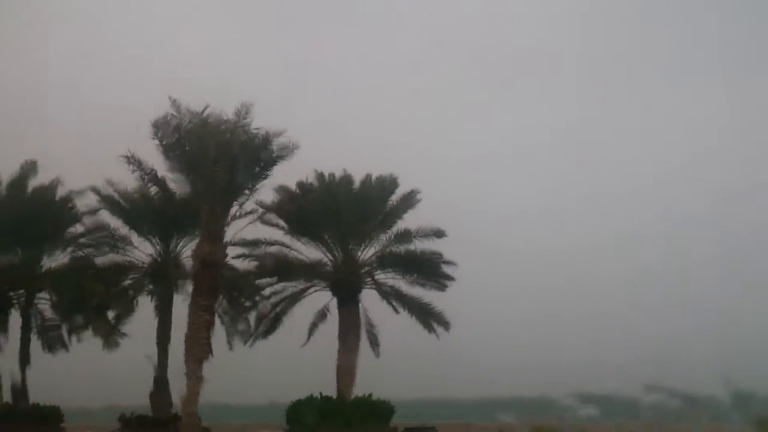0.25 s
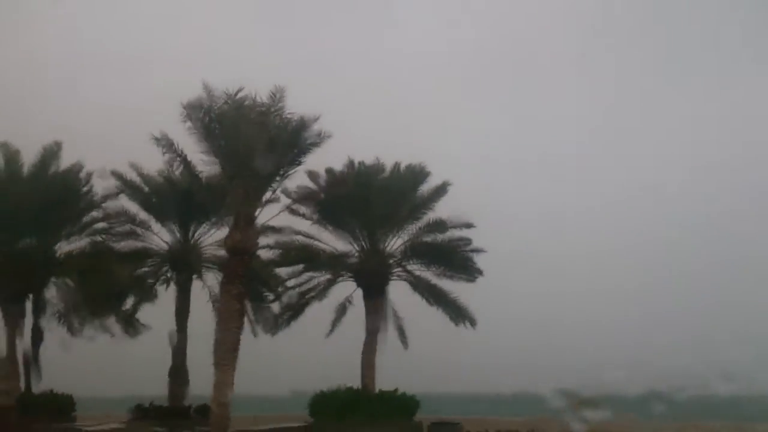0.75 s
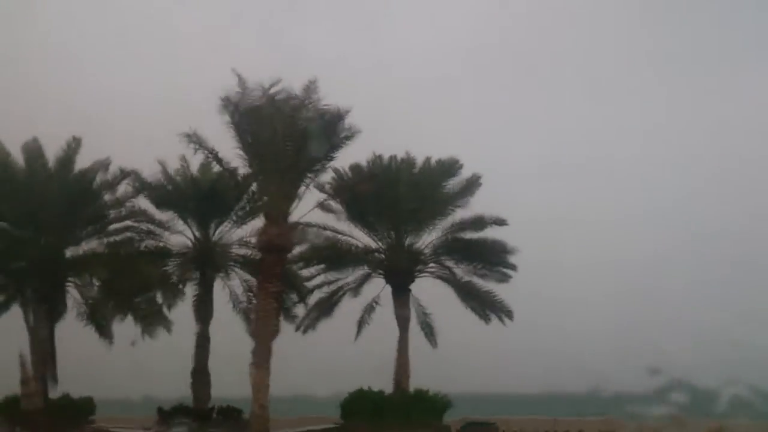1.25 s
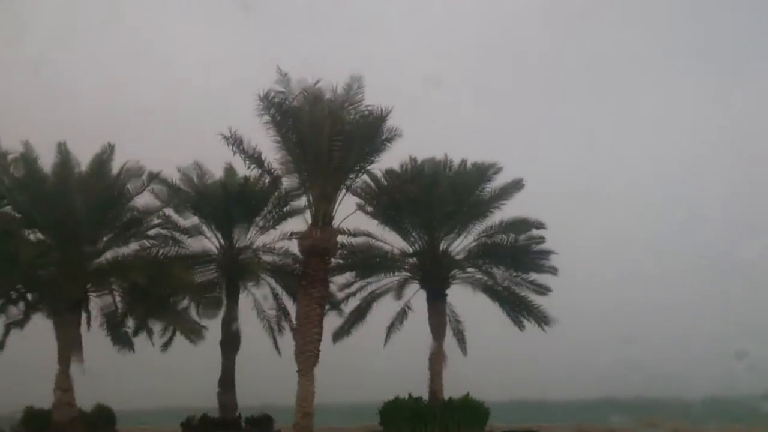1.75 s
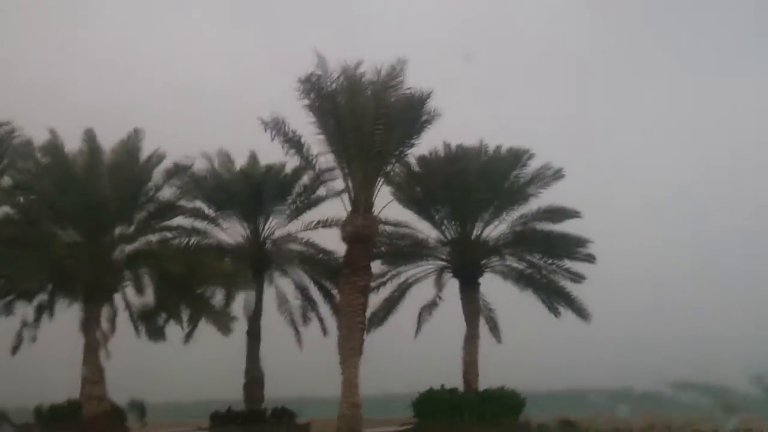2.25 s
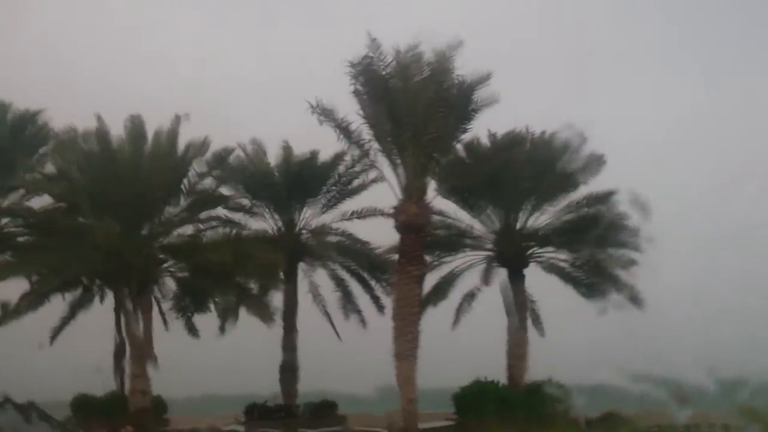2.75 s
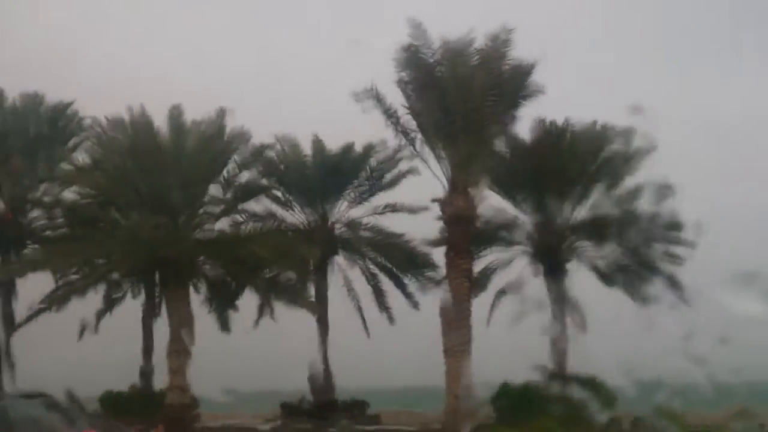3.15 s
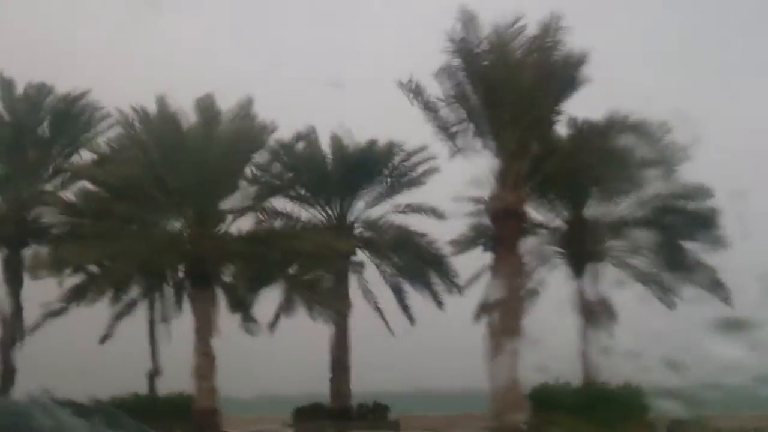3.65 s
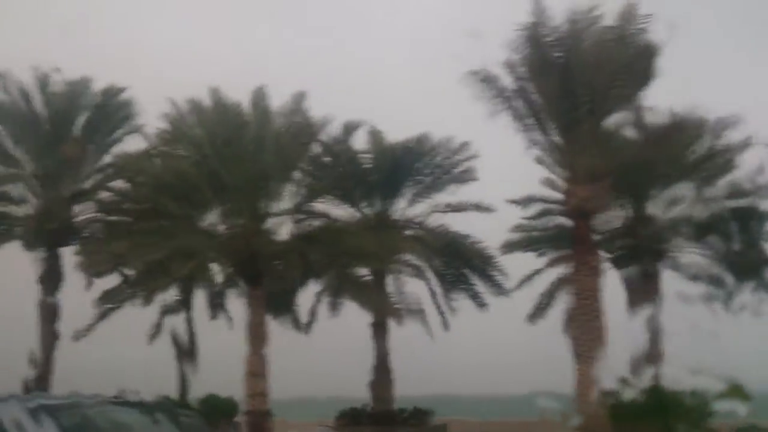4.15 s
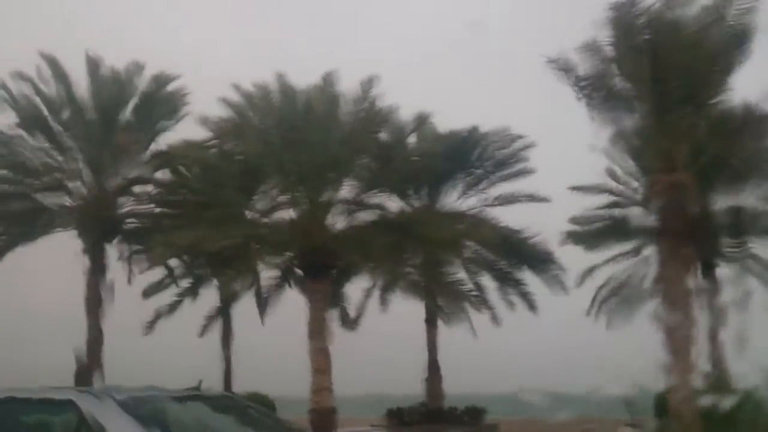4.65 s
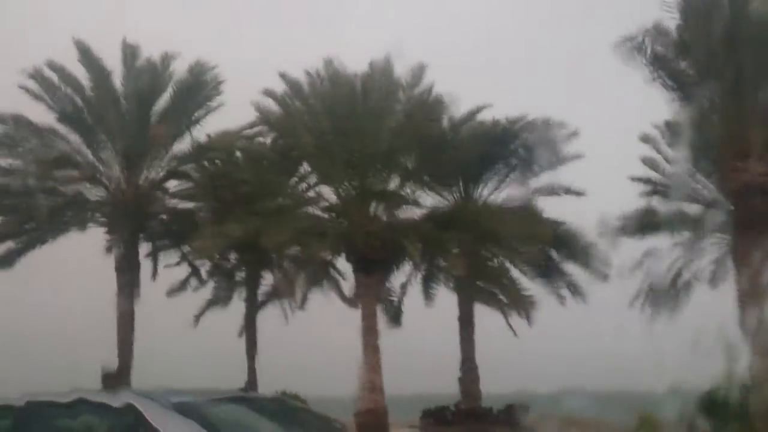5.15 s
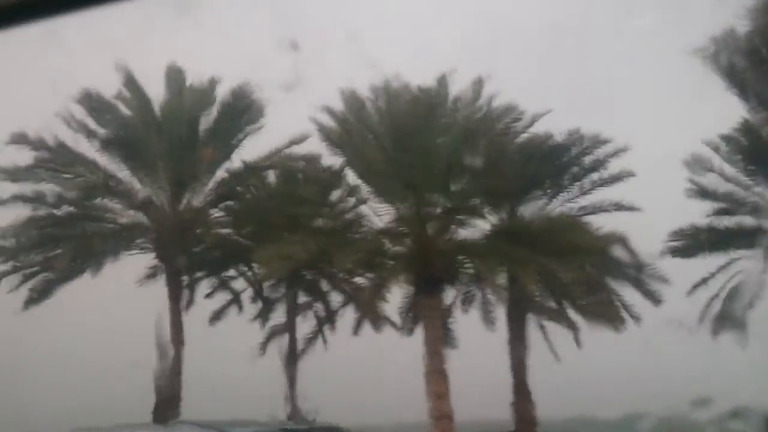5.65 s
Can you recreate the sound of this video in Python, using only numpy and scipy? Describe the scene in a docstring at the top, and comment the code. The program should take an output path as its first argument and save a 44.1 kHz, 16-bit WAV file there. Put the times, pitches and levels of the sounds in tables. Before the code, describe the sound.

A close microphone in a car cabin picks up bass-heavy engine drone and buffeting wind, with fine rain patter and tiny splashes much quieter on the right-hand window. Short, damped, hollow knocks of big raindrops hit close to the left microphone, sparse at first, more frequent between 4 and 5 seconds. Faint trim bumps, a tiny squeak and a thin air whistle lie underneath.

```python
"""Car in a rainstorm, windows closed

Inside a slowly rolling car: the engine, sines locked to its firing rate, booms as that rate rises and falls.
Noise rumbles for wind and wet road; noise and tiny impacts make the rain hiss on the glass to the right.
Heavy drops knock a damped shell close to the left microphone port; the trim bumps and squeaks faintly.
Smaller layers are splashes, tread hum, brief low swells near 66 Hz, and a thin whistle of air."""
import sys
import numpy as np
from scipy import signal
from scipy.fft import rfft, irfft, next_fast_len
from scipy.io import wavfile
from scipy.ndimage import uniform_filter1d, map_coordinates

SR = 44100
rng = np.random.default_rng(int(sys.argv[2]) if len(sys.argv) > 2 else 0)


def output_pcm(signal):
    """Save a mono or channel-first signal as 16-bit PCM at the path in sys.argv[1].

    Samples are clipped to [-1, 1] before scaling.
    """
    pcm = np.clip(np.atleast_2d(signal).T, -1, 1) * 32767
    wavfile.write(sys.argv[1], SR, np.round(pcm).astype(np.int16))


N = 260190
TOP_HZ = 14500  # the recorder's upper band limit

# Engine speed. Each row: time in seconds, firing rate in Hz.
FIRING_RATE = [(0.08, 39.28), (0.73, 41.93), (0.91, 39.75), (1.08, 36.47), (1.29, 35.04), (1.5, 35.27),
               (1.891, 33.51), (2.678, 33.51), (2.85, 36.82), (3.12, 40.18), (3.33, 47.0), (3.53, 50.14),
               (3.858, 43.25), (4.249, 42.58), (4.541, 40.24), (4.81, 36.3), (5.34, 35.93), (5.801, 33.46)]


def amp(db):
    """Decibels to gain."""
    return 10 ** (np.asarray(db) / 20)


def unit(x):
    """Scale to rms 1."""
    return x / np.sqrt(np.mean(x ** 2) + 1e-20)


def along(points, hz):
    """(Hz, value) points read on a log frequency axis."""
    f, v = np.transpose(points)
    return np.interp(np.log(hz + 1), np.log(f + 1), v)


def curves(rows):
    """One value per sample for each column after the time."""
    s, *cols = np.transpose(rows)
    return [np.interp(np.arange(N) / SR, s, c) for c in cols]


def wobble(rate):
    """A smooth random curve, rate knots a second."""
    knots = rng.standard_normal(int(N * rate / SR) + 4)
    return map_coordinates(knots, [np.arange(N) * rate / SR])


def filtered(x, response):
    """x times a complex response of frequency."""
    m = next_fast_len(N + SR // 2)
    spectrum = rfft(x, m) * response(np.fft.rfftfreq(m, 1 / SR))
    return irfft(spectrum, m)[..., :N]


def ports(balance_db):
    """Left and right gains whose mean is 1, from left minus right in dB."""
    left = amp(np.atleast_1d(balance_db))
    return 2 * np.array([left, np.ones_like(left)]) / (1 + left)


def swell(s, length):
    """A bell-shaped envelope around time s."""
    return np.exp(-.5 * np.minimum(((np.arange(N) / SR - s) / length) ** 2, 100))


def noise_band(noise, centre_hz, width_hz):
    """Noise held to a narrow band and scaled to rms 1."""
    return unit(filtered(noise, lambda hz: 1 / (1 + ((hz - centre_hz) / width_hz * 2) ** 4)))


def patchy(patchy_db):
    """Two unrelated noises sharing patches of random gain in time and frequency."""
    z = signal.stft(rng.standard_normal((2, N)), nperseg=512)[2]
    field = uniform_filter1d(rng.standard_normal(z.shape[1:]), size=6, axis=0)
    field = uniform_filter1d(field, size=14, axis=1)
    patched = z * amp(patchy_db * unit(field))
    return unit(signal.istft(patched, nperseg=512)[1][:, :N])


def droplets(rate, spread_db):
    """Two streams of tiny impacts of random size and sign, rate a second."""
    hit = rng.random((2, N)) < rate / SR
    size = amp(spread_db * np.minimum(rng.standard_normal((2, N)), 2))
    return unit(hit * size * np.sign(rng.standard_normal((2, N))))


def in_cabin(pair, spectrum):
    """Colour two noises and spread them over the ports; their middle has rms 1."""
    # Likeness of the two ports. Each row: frequency in Hz, correlation from -1 to 1.
    likeness = [(30, .98), (70, .98), (130, .8), (290, .72), (630, .55), (1370, -.25), (3000, 0)]
    # Port balance. Each row: frequency in Hz, left minus right in dB.
    balance = [(25, -5.5), (70, -6), (130, -6.5), (200, -4.5), (370, -3.5), (680, -7), (1300, -13),
               (2300, -5.5), (4200, -11), (5200, -8.5), (7300, -16.5), (10000, -8), (14000, -12)]
    # The left port turns the bass ahead. Each row: frequency in Hz, phase lead in radians.
    bass_lead = [(70, 0.47), (160, 0.21)]

    def mid_side(hz):
        turn = np.arccos(np.clip(along(likeness, hz), -1, 1)) / 2
        return amp(along(spectrum, hz)) * [np.cos(turn), np.sin(turn)]

    def port_response(hz):
        return ports(along(balance, hz)) * np.exp(1j * np.outer([1, 0], along(bass_lead, hz)))

    mid, side = filtered(pair, mid_side)
    both = filtered(np.array([mid + side, mid - side]), port_response)
    return both / np.std(both.mean(axis=0))


def wind(rumble_db=-31, roar_db=-46, rush_db=-57.5, gust_db=1.5):
    """Wind and wet road shake the body and rush past the windows; levels waver around their settings."""
    # Spectra of body shake, wet road and wind at the windows.
    # Each row: frequency in Hz, relative density in dB per Hz.
    rumble_spectrum = [(3, -39), (8, -11), (17, 1.5), (24, 9), (31, -3.5), (52, 1.5), (66, 2.5), (78, -4.5),
                       (100, -13.5), (130, -35), (250, -82)]
    roar_spectrum = [(60, -13), (100, -2.5), (135, 0), (185, -6.5), (250, -9), (300, -10), (370, -13.5),
                     (460, -16), (560, -21.5), (1200, -64)]
    rush_spectrum = [(250, -16), (480, 0.5), (600, -0.5), (790, 1), (1000, -6.5), (1450, -14.5),
                     (2200, -17), (5000, -58)]
    # Road noise, then wind at the windows. Each row: time in seconds, level change in dB.
    road_level = [(0.0, 2.5), (0.3, -5), (0.7, -0.5), (1.25, 1.5), (1.8, -1), (2.2, 0), (2.65, -1),
                  (3.0, 0), (3.45, -0.5), (3.8, 0), (4.3, 3), (4.7, -2.5), (5.3, -2), (5.9, -1)]
    gusts = [(0.0, 1.5), (0.45, -2.5), (0.68, 3), (1.1, 0), (1.8, 0), (2.5, 1), (3.05, -2), (3.9, -0.5),
             (4.4, 1), (5.35, -1), (5.9, 1)]
    road = curves(road_level)[0] + gust_db * wobble(9)
    shake = 1.2 * wobble(11)
    # the body shake follows half of the road's level changes
    rumble = amp(rumble_db + .5 * road + shake) * in_cabin(rng.standard_normal((2, N)), rumble_spectrum)
    roar = amp(roar_db + road) * in_cabin(rng.standard_normal((2, N)), roar_spectrum)
    flutter = .9 * wobble(14)
    rush_gain = amp(rush_db + curves(gusts)[0] + flutter)
    rush = rush_gain * in_cabin(rng.standard_normal((2, N)), rush_spectrum)
    return rumble + roar + rush


def whistle(centre_hz=2063, width_hz=110, level_db=-70, start_s=2.41, rise_s=.2):
    """Air starts to sing faintly at a window seal: a narrow noise band that comes in and stays."""
    band = noise_band(rng.standard_normal((2, N)), centre_hz, width_hz)
    rise = np.clip((np.arange(N) / SR - start_s) / rise_s, 0, 1)
    return amp(level_db) * rise * band * ports(-6.0)


def pace(lag_s=0.28, cruise_hz=41.1):
    """Road speed as firing rate above cruise, in Hz: the car trails the engine."""
    s, firing = np.transpose(FIRING_RATE)
    return np.interp(np.arange(N) / SR - lag_s, s, firing) - cruise_hz


def tyres(cruise_db=-62.5, db_per_hz=0.95, drone_db=4):
    """The treads hum in a narrow band over a low drone, louder as the car gathers speed."""
    hum = noise_band(rng.standard_normal(N), centre_hz=442, width_hz=36) * ports(0.5)
    drone = noise_band(rng.standard_normal(N), centre_hz=132, width_hz=30) * ports(-6.0)
    # drone_db is relative to the hum
    return amp(cruise_db + db_per_hz * pace()) * (hum + amp(drone_db) * drone)


def low_swells(swell_hz=66, lead=0.55):
    """The low rumble swells briefly near 66 Hz: sines under bells; the left port leads, in radians."""
    # Low swells. Each row: centre in seconds, level in dB ahead of the port balance,
    # bell length in seconds.
    swell_rows = [(.88, -29, .04), (2.0, -26, .08), (3.58, -24, .025), (4.34, -27, .025),
                  (5.32, -25.5, .03), (5.62, -30, .06)]
    t = np.arange(N) / SR
    out = np.zeros((2, N))
    for s, db, length in swell_rows:
        start = rng.uniform(0, 2 * np.pi)
        tone = np.sin(2 * np.pi * swell_hz * (t - s) + start + np.array([[lead], [0]]))
        out += amp(db) * swell(s, length) * tone
    return out * ports(-9.0)


def trim(thud_db=-9, octave_db=-6):
    """Panels flex with dull, noisy bumps, and rub with tiny gliding squeaks."""
    # Soft bumps. Each row: centre in seconds, tone level in dB ahead of the port balance,
    # bell length in seconds, pitch in Hz.
    trim_bumps = [(.663, -47, .007, 540), (.693, -39, .015, 275), (1.195, -46, .012, 420),
                  (1.326, -37, .017, 310), (1.32, -50, .015, 620), (2.136, -38.5, .007, 355),
                  (2.56, -53, .01, 720)]
    # One list per squeak. Each row: time in seconds, pitch in Hz, level in dB ahead of the port balance.
    squeak_tracks = [
        [(2.256, 6970, -66), (2.264, 7100, -48), (2.268, 7250, -45.5), (2.271, 8410, -53), (2.274, 11610, -57)],
        [(5.811, 5600, -66), (5.821, 5020, -55), (5.829, 4720, -55.5), (5.836, 4820, -56), (5.844, 4920, -64)],
    ]
    # Phase roughness of each squeak in radians.
    roughness = [.7, .3]
    bumps, squeaks, t = np.zeros(N), np.zeros(N), np.arange(N) / SR
    for s, db, length, hz in trim_bumps:
        band = signal.butter(4, [hz / 1.6, 1.8 * hz], "bandpass", fs=SR, output="sos")
        thud = amp(thud_db) * unit(signal.sosfilt(band, rng.standard_normal(N)))
        bumps += amp(db) * swell(s, length) * (np.sin(2 * np.pi * hz * t) + thud)
    for track, rough in zip(squeak_tracks, roughness):
        pitch, level = curves(track)
        phase = 2 * np.pi * np.cumsum(pitch) / SR + rough * wobble(1100)
        # only low squeaks keep an overtone
        octave = amp(octave_db) * np.sin(2 * phase) / (1 + (pitch / 5500) ** 8)
        sounding = (t > track[0][0]) * (t < track[-1][0])
        squeaks += amp(level) * sounding * (np.sin(phase) + octave)
    return bumps * ports(-3.8) + squeaks * ports(-20)


def rain(patter_db=1.5, spray_db=-0.08, grain=0.82, spray_grain=0.28):
    """Dense droplets patter on the glass over a fine spray: patchy noise mixed with tiny impacts."""
    # How hard the rain falls. Each row: time in seconds, level in dB before patter_db is added.
    patter_levels = [(0.0, -61.5), (0.4, -66.5), (0.7, -64.5), (1.0, -62), (1.4, -64.5), (1.8, -63),
                     (2.08, -65), (2.3, -62.5), (2.55, -61.5), (2.75, -63.5), (3.3, -62.5), (4.3, -62.5),
                     (4.95, -61), (5.3, -61.5), (5.9, -62)]
    # Sheets of spray blown over the glass. Each row: time in seconds, level in dB before spray_db is added.
    spray_levels = [(0.05, -60.5), (0.22, -66.5), (0.45, -62.5), (0.65, -62.5), (0.87, -65.5), (1.5, -63),
                    (2.0, -65.5), (2.35, -64), (2.5, -63), (2.75, -65), (3.27, -66.5), (3.42, -61),
                    (3.55, -60.5), (3.8, -63), (4.4, -63), (4.88, -60.5), (5.25, -63), (5.5, -64.5),
                    (5.85, -63.5)]
    # Spectra of patter and spray. Each row: frequency in Hz, relative density in dB per Hz.
    patter_spectrum = [(500, -72), (1000, -1), (1700, 4), (2100, 2.5), (2500, 0), (3300, 0), (4100, 0),
                       (4900, -6), (6500, -11.5), (9000, -34), (14000, -53)]
    spray_spectrum = [(2500, -36), (4500, -11), (5600, -4), (6500, -0.5), (7500, 0), (8600, -7.5),
                      (10000, -8.5), (12000, -12.5), (13300, -19.5), (14500, -50)]
    flurry = amp(1.5 * wobble(18))
    impacts = flurry * droplets(rate=900, spread_db=4.0)
    patter = in_cabin(patchy(patchy_db=2.5) + grain * impacts, patter_spectrum)
    spray = in_cabin(patchy(patchy_db=1.56) + spray_grain * impacts, spray_spectrum)
    patter_gain = amp(curves(patter_levels)[0] + patter_db)
    spray_gain = amp(curves(spray_levels)[0] + spray_db)
    return patter_gain * patter + spray_gain * spray


def splashes(wash=0.45):
    """Blown water slaps the glass in short bursts of droplets and noise."""
    # Splashes. Each row: centre in seconds, level in dB ahead of the treble loss and port balance,
    # band centre in Hz, bell length in seconds.
    slaps = [(0.09, -62, 4600, 0.0089), (.132, -65, 3200, 0.011), (.80, -58, 1700, .006),
             (1.027, -56.5, 3800, 0.0073), (1.177, -58, 7000, .003), (1.30, -60, 2200, .008),
             (1.693, -59, 2990, .005), (2.22, -57, 2708, 0.0081), (2.562, -58.5, 1700, .025),
             (2.652, -54.5, 1200, .007), (2.768, -55.5, 4010, 0.0063), (2.883, -57, 4300, .006),
             (2.991, -60, 3448, .006), (3.117, -60, 3300, .012), (4.029, -49.5, 1600, 0.0048),
             (4.035, -52.5, 2394, 0.0053), (4.03, -56, 5500, .008), (4.545, -53.5, 4180, .004),
             (4.86, -61, 5200, .03), (5.162, -55, 2002, 0.0098), (5.435, -52.5, 4494, .004)]
    out = np.zeros((2, N))
    water = unit(droplets(rate=2800, spread_db=5) + wash * rng.standard_normal((2, N)))
    for s, db, centre_hz, length in slaps:
        edges = [centre_hz / 1.7, min(centre_hz * 1.7, TOP_HZ)]
        band = signal.butter(2, edges, "bandpass", fs=SR, output="sos")
        out += amp(db) * swell(s, length) * unit(signal.sosfilt(band, water))
    return filtered(out, lambda hz: 1 / (1 + (hz / 10000) ** 6)) * ports(-16.5)


def heavy_drops(right_db=-25, thump_hz=300, hard_hz=1700, hard_crack=.09, crack_power=9):
    """Each drop gives a soft push and a faint crack to a well damped shell by the left port."""
    # Drops. Each row: time in seconds, peak at the left port in dB, contact brightness in Hz,
    # extra thump in dB.
    drop_hits = [(.663, -27, 430, 5), (1.5878, -8.2, 1780, -1), (2.1665, -12.7, 1700, 0),
                 (2.370, -23, 1250, 9), (3.8844, -14.6, 1690, 2), (4.1914, -15.1, 1580, 4),
                 (4.344, -27, 1050, -14), (4.4896, -15.6, 1520, 4), (4.5667, -15.2, 1470, 5),
                 (5.0269, -8.1, 1640, 1), (5.6306, -13.1, 1430, .5)]
    # Modes of the shell. Each row: frequency in Hz, width in Hz, relative level in dB;
    # frequency and level vary a little from drop to drop.
    shell_modes = [(243, 29, 3), (358, 34, 1.2), (612, 62, -8.2), (920, 130, -15.5), (1100, 190, -12.2),
                   (2800, 670, -14), (5500, 900, -25)]
    out = np.zeros(N)
    hz = np.fft.rfftfreq(4096, 1 / SR)
    t = np.arange(-2048, 2048) / SR
    damping = np.exp(-(t / .009) ** 4)  # the ring is gone within two or three swings
    for s, db, soft_hz, thump_db in drop_hits:
        # brighter contacts crack far more
        crack = hard_crack * (soft_hz / hard_hz) ** crack_power
        shell = np.zeros(len(hz), complex)
        for centre, width, level in shell_modes:
            detune, relevel = rng.standard_normal(2)
            c = centre * (1 + .015 * detune)
            resonance = 1j * hz * width / (c * c - hz * hz + 1j * hz * width)
            shell += amp(level + .6 * relevel) * resonance
        contact = 1 / (1 + (hz / soft_hz) ** 6) + crack / (1 + (hz / 10000) ** 4)
        thump = amp(thump_db / (1 + (hz / thump_hz) ** 6))
        knock = damping * np.fft.fftshift(irfft(-shell * contact * thump))
        first = round(s * SR) - len(t) // 2
        out[first:][:len(t)] += amp(db) * knock / np.abs(knock).max()
    return out * amp([[0], [right_db]])


def engine(cabin_hz=64.3, cabin_width_hz=2.9, second_db=-36, lead=0.88, flutter_db=1.15, blur=.14):
    """The firings boom in the cabin; their overtones come up under load. Lead and blur are in radians."""
    # Boom of the firing rate. Each row: time in seconds, level in dB around which it flutters.
    boom_level = [(0.03, -18.5), (0.17, -19), (0.28, -22), (0.42, -21), (0.53, -23), (0.75, -23.5),
                  (0.95, -21), (1.2, -20.5), (1.38, -22.3), (1.52, -20), (1.72, -21), (2.0, -18.5),
                  (2.2, -19), (2.48, -16.5), (2.75, -22), (3.05, -22), (3.25, -27), (3.45, -34.5),
                  (3.58, -27.5), (3.75, -33), (3.98, -27.5), (4.15, -26), (4.26, -31.5), (4.33, -23.5),
                  (4.45, -21), (5.15, -23), (5.65, -22), (5.83, -20.5)]
    # Engine load, which lifts the overtones. Each row: time in seconds, lift in dB.
    throttle = [(0.05, 4), (0.3, 4), (0.7, 2.5), (0.9, -4), (2.7, -6.5), (2.95, 0), (3.12, 8), (3.3, -1),
                (3.55, 2), (3.8, -6)]
    # Overtones. Each row: multiple of the firing rate, level in dB before the load lifts it.
    overtone_levels = [(2, -52), (3, -57), (4, -54), (5, -66), (6, -66)]
    firing = curves(FIRING_RATE)[0]
    phase = 2 * np.pi * np.cumsum(firing) / SR
    # the left port loses bass, which also turns its phase ahead
    bass_ports = ports(-10.5)
    tone = np.sin(np.array([phase + lead, phase]) + 0.065 * wobble(6.6)) * bass_ports
    boom_gain = amp(curves(boom_level)[0] + flutter_db * wobble(22))
    boom = boom_gain * tone / np.std(tone.mean(axis=0))
    # the octave swells as it nears the air resonance of the cabin
    octave = unit(np.sin(np.array([2 * phase + lead, 2 * phase])))
    resonance = 1 / np.hypot(1, (2 * firing - cabin_hz) / cabin_width_hz)
    second = amp(second_db + 1.9 * wobble(3.4)) * octave * resonance
    overtones = np.zeros(N)
    for k, db in overtone_levels:
        overtone = unit(np.sin(round(k) * phase + blur * wobble(12)))
        overtones += amp(db + 1.35 * wobble(7)) * overtone
    return boom + second * bass_ports + amp(curves(throttle)[0]) * overtones * ports(-7.5)


def scene():
    """Everything heard in the cabin, from the background to the engine."""
    background = wind() + whistle() + tyres() + low_swells() + trim()
    water = rain() + splashes() + heavy_drops()
    return background + water + engine()


def record(dry, fade_s=.005):
    """The recorder keeps nothing above its band limit; the sound fades in and out briefly."""
    t = np.arange(N) / SR
    fade = np.sin(np.pi / 2 * np.minimum(np.minimum(t, t[-1] - t) / fade_s, 1))
    return filtered(dry * fade, lambda hz: hz < TOP_HZ)


dry = scene()
out = record(dry)
output_pcm(out)
```